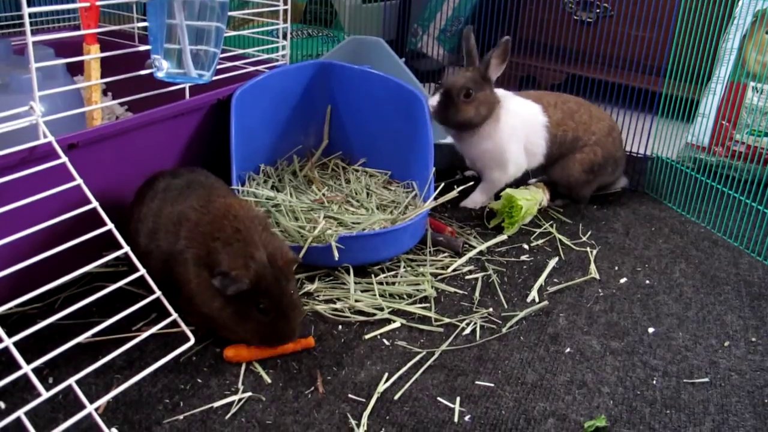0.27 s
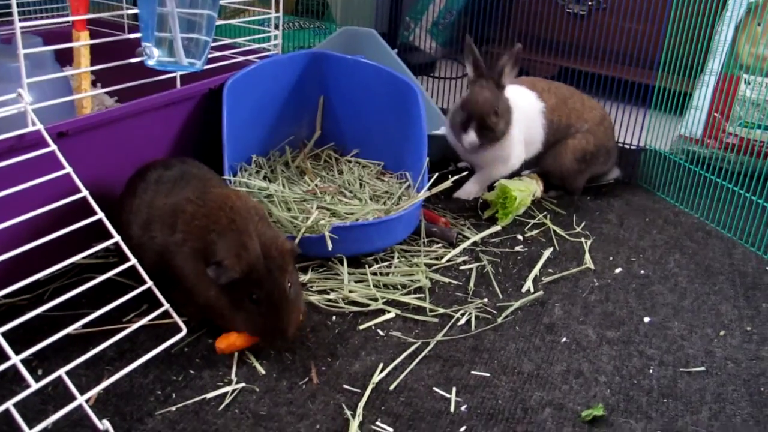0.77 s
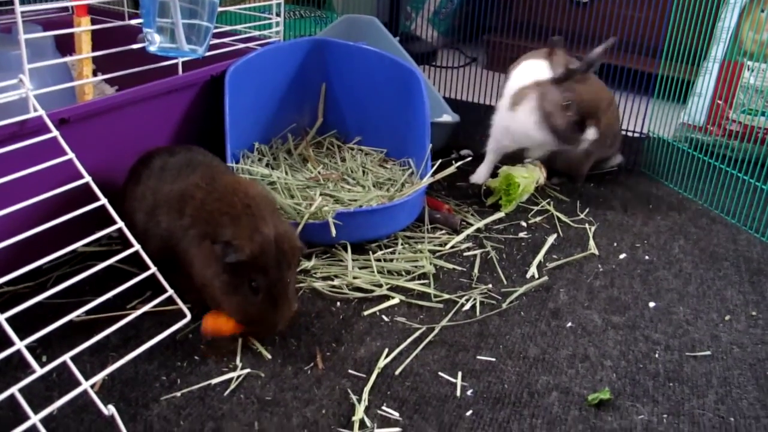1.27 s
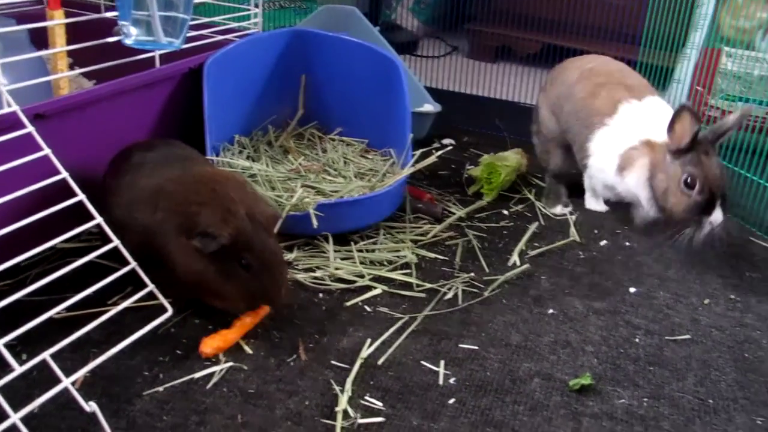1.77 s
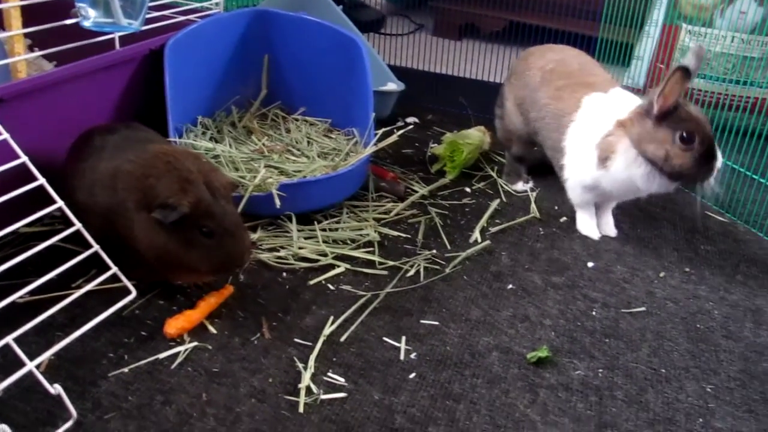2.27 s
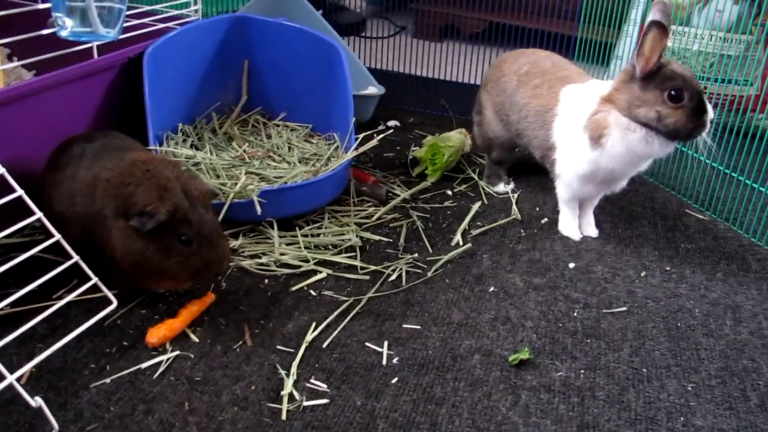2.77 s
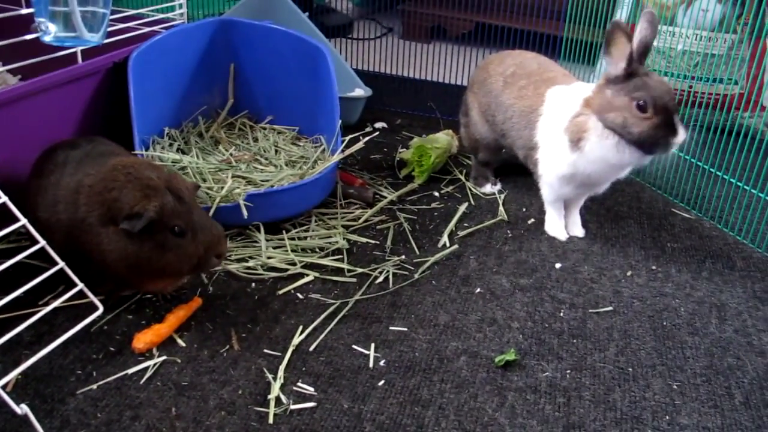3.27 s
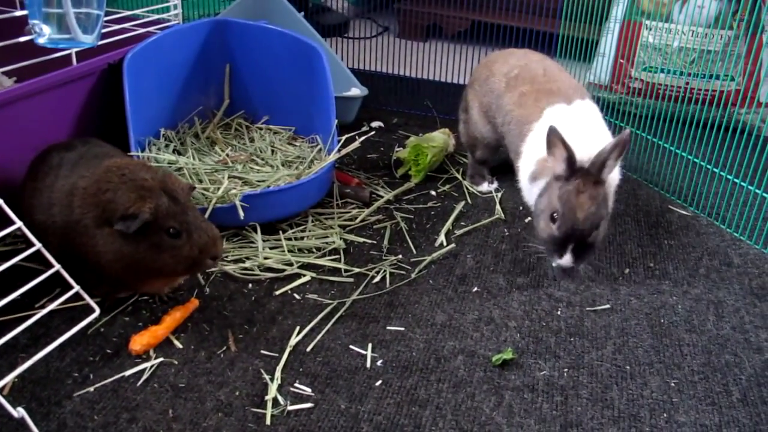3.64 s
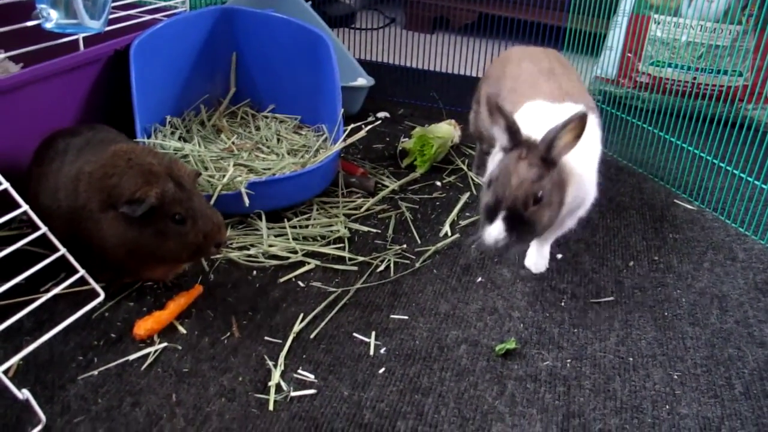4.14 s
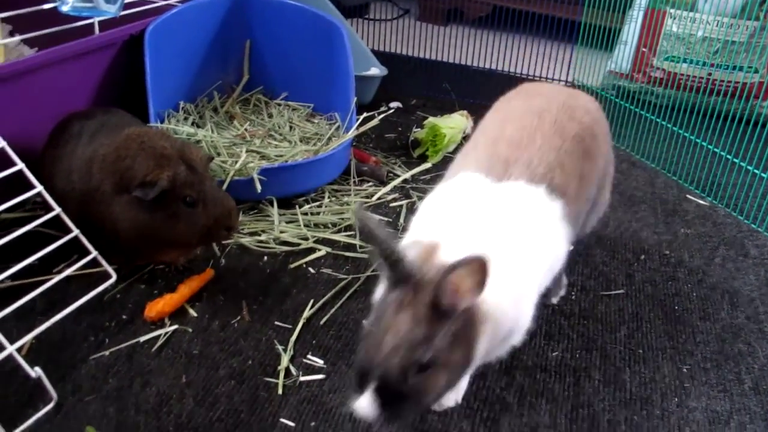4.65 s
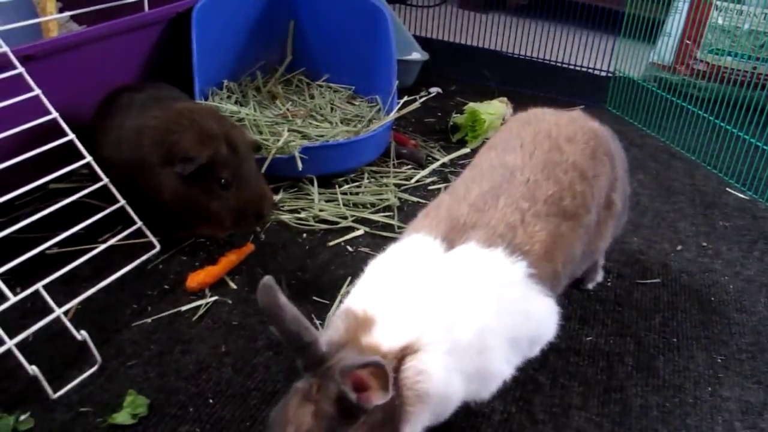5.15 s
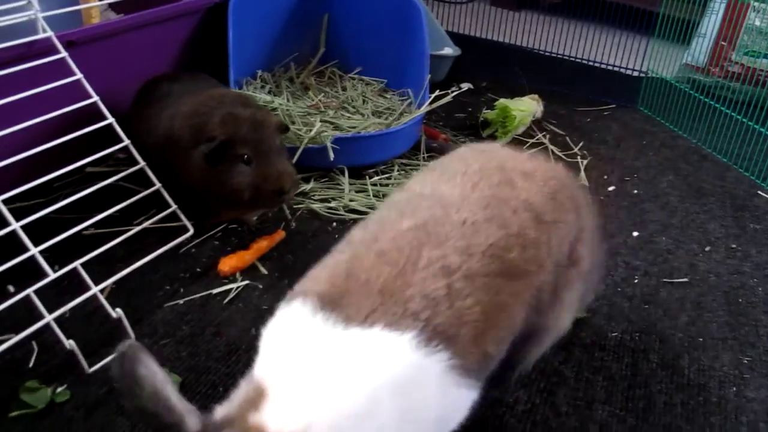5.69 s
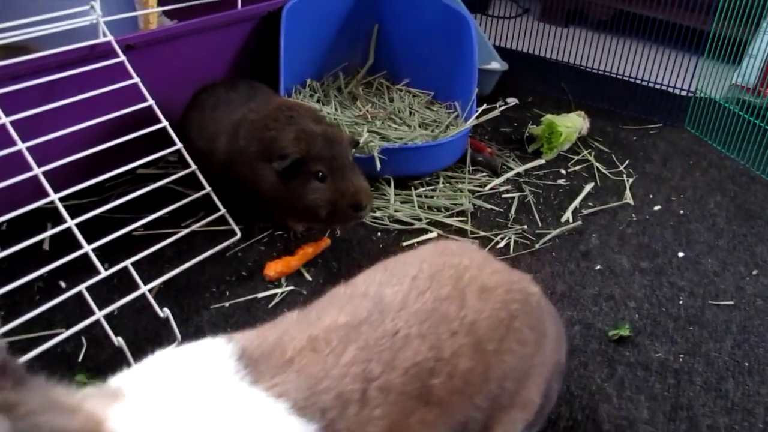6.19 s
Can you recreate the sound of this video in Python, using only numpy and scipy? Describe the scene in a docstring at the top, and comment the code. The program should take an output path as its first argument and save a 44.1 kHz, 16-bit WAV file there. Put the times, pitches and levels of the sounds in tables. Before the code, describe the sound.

A quiet indoor pen heard closely in stereo, with soft airy room noise, a very thin high whine and a faint low hum that sinks and fades around 3 s. From the start a guinea pig clucks in short, rapid notes, most flicking upward at the end, bright and frequent until about 2.3 s. Hay rustles and crunches over the first second, with a loud, sharp stalk snap at 0.7 s. More crisp cracks come at 1.25 and 1.5 s, amid a run of soft, padded rabbit thuds from 1.1 to 1.9 s. From 3 s the clucks grow lower, softer and hoarser, with light crunches and a small snap near 4 s. Hop thuds return at 4.6 and 4.9 s; hay rustles around 5.1 and 5.5 s. More paws fall at 5.8 and 5.9 s, with a hard, near, dry click between them. A faint gliding squeak follows at 6.2 s, among the last quiet clucks.

```python
"""A guinea pig clucks in bouts of upswept notes, lower and softer as it settles: harmonics slide through
fixed resonances. Under it lie a quiet room of filtered noise, a low sine hum and a thin unsteady whine.
It nibbles among loose hay, which rustles, crunches and ticks as random fractures, and two-break stalks snap.
A rabbit hops over the carpet: damped thuds with scuffs. Late on come a near click and a faint gliding squeak.
The sounds of the animals and the hay, but for click and squeak, echo briefly in an indoor pen."""
import sys
import numpy as np
from scipy import signal
from scipy.fft import rfft, irfft, next_fast_len
from scipy.io import wavfile
from scipy.ndimage import uniform_filter1d

SR = 44100
rng = np.random.default_rng(int(sys.argv[2]) if len(sys.argv) > 2 else 0)


def wav_out(sig):
    """Save sig, one row per channel (or a flat mono array), as 16-bit PCM at SR to the path in sys.argv[1]."""
    wavfile.write(sys.argv[1], SR, np.round(np.clip(np.atleast_2d(sig).T, -1, 1) * 32767).astype(np.int16))


N = 283115
TIME = np.arange(N) / SR
EDGE_HZ = 15800  # upper band limit


def amp(db):
    """Level as a logarithm of amplitude: converts decibels to linear gain."""
    return 10 ** (np.asarray(db) / 20)


def unit(x):
    """Power normalisation: scales a signal to a root mean square of 1."""
    return x / np.sqrt(np.mean(x ** 2) + 1e-20)


def read(points, hz):
    """Spectral interpolation: reads a table along a logarithmic frequency axis."""
    f, value = np.transpose(points)
    return np.interp(np.log(hz + 1), np.log(f + 1), value)


def follow(points, at, axis=1):
    """Linear interpolation: reads one column of a curve, held constant beyond its ends."""
    columns = np.transpose(points)
    return np.interp(at, columns[0], columns[axis])


def panned(x, pan_db):
    """Interaural level difference: places a sound by making left louder than right by pan_db."""
    return x * amp([[pan_db / 2], [-pan_db / 2]])


def add(mix, s, sound):
    """Superposition: sums a sound into the mix from time s, trimmed to fit."""
    at = round(s * SR)
    sound = sound[..., max(-at, 0):]
    part = mix[:, max(at, 0):][:, :sound.shape[-1]]
    part += sound[..., :part.shape[1]]


def colour(x, points):
    """Linear filtering: multiplies the spectrum of a long sound by a gain curve."""
    size = next_fast_len(N)
    gain = amp(read(points, np.fft.rfftfreq(size, 1 / SR)))
    return irfft(rfft(x, size) * gain, size)[..., :N]


def causal(gain):
    """Minimum phase: the impulse response of this spectrum whose energy comes earliest."""
    log_gain = np.log(np.maximum(np.r_[gain, gain[-2:0:-1]], 1e-5))
    return np.fft.ifft(np.exp(np.conj(signal.hilbert(log_gain)))).real


def room(x, walls_db, tail_db):
    """Reverberation: a few discrete wall echoes over a diffuse, exponentially decaying tail."""
    # Early echoes of the pen's walls. Each row: delay in seconds, level in dB relative to walls_db.
    walls = [(0.011, -12), (.015, -5), (0.0244, -7.5)]
    # Absorption in the room. Each row: frequency in Hz, time to decay by 60 dB in seconds.
    decay_times = [(1200, 0.27), (14000, 0.22)]
    size = SR // 3
    hz, t, z = signal.stft(rng.standard_normal((2, size)), SR, nperseg=256)
    fade = amp(-60 * t / read(decay_times, hz)[:, None])
    tail = signal.istft(z * fade, SR, nperseg=256)[1][:, :size]
    tail = tail * np.minimum(TIME[:size] / 0.0066, 1)  # the tail builds up over 6.6 ms
    echo = amp(tail_db) * tail / np.linalg.norm(tail[0])
    for delay, db in walls:
        echo[:, round(delay * SR)] += amp(db + walls_db)
    return signal.oaconvolve(x, echo, axes=1)[:, :N]


def clucks(scoop=4.49, rolloff_db=-5, rise=0.0041, fall=0.0078, hoarse_db=-21, clear_hz=1000,
           top_hz=3600, top_db=-7, upswept_rise=0.0055, swell_db=7):
    """Source and filter: upswept vocal harmonics, hoarser toward the end, pass through throat resonances."""
    # Each row: start in seconds, length in seconds, middle pitch in Hz, base level in dB, shape of bend.
    notes = [ (-.025, 0.046, 912, -41.5, "hook"), (.163, 0.061, 888, -44, "hook"),
             (0.26, 0.05, 1011, -42, "dip"), (.51, 0.031, 1167, -41, "whip"),
             (0.576, 0.064, 976, -41.5, "hook"), (0.684, 0.055, 958, -43.5, "hook"),
             (0.977, 0.032, 1170, -40.5, "whip"), (1.041, 0.054, 974, -40, "hook"),
             (1.438, 0.04, 955, -41, "whip"), (1.517, .052, 894, -42.5, "lift"),
             (1.594, 0.063, 917, -42, "dip"), (1.823, 0.061, 858, -41.5, "hook"),
             (1.927, 0.056, 959, -41.5, "dip"), (2.203, 0.069, 866, -45, "hook"),
             (2.313, 0.049, 1216, -43, "lift"), (2.938, 0.055, 942, -45, "dip"),
             (3.043, 0.028, 980, -42, "flat"), (3.236, 0.06, 865, -46, "dip"),
             (3.339, 0.065, 826, -44.5, "dip"), (3.435, 0.064, 932, -47.5, "dip"),
             (3.692, 0.059, 849, -49.5, "hook"), (3.807, 0.026, 1075, -54.5, "flat"),
             (4.07, 0.076, 785, -50, "dip"), (4.175, 0.068, 856, -44.5, "dip"),
             (4.303, 0.018, 773, -45.5, "flat"), (4.525, 0.068, 694, -47.5, "dip"),
             (4.646, 0.054, 701, -46, "dip"), (5.203, 0.053, 748, -46.5, "lift"),
             (5.304, 0.036, 946, -47.5, "whip"), (5.487, 0.064, 782, -48, "lift"),
             (5.589, 0.037, 740, -48, "lift"), (6.124, 0.034, 792, -54, "lift"),
             (6.312, 0.061, 699, -51, "lift")]
    # The guinea pig's throat and nose. Each row: frequency in Hz, gain in dB.
    throat = [(600, 1.5), (860, -7), (1080, 1), (1250, -14), (1600, -10.5), (2200, -7.5), (2900, -9.5),
              (4300, -16), (6400, -8), (9000, -23)]
    # The push of air through one cluck. Each row: share of its length, gain in dB.
    air_push = [(0, 3), (.5, 0), (1, 1)]
    # Overtones as the head turns. Each row: time in seconds, second harmonic in dB, higher harmonics in dB.
    facing = [(0, 1, 1), (1.65, -3, -13), (1.94, -5, -2), (3, -11, 0), (3.4, -0.5, 5.5), (4.6, -2, -3),
              (5.4, 6, 6), (6.4, 10.5, 4.5)]
    # Ways a cluck bends. Each entry: opening and final pitch factors, lateness of the upsweep as an exponent.
    shapes = {"whip": (.77, 2.2, 2.8), "hook": (.94, 2.7, 3.7), "lift": (.94, 1.7, 3),
              "dip": (1.17, 1.95, 3), "flat": (0.95, 1.26, 3.2)}
    out = np.zeros((2, N))
    k = np.arange(1, 11)[:, None]  # harmonic numbers
    for start, length, middle, db, shape in notes:
        opening, final, bend = shapes[shape]
        t = np.arange(0, length, 1 / SR)
        u = t / t[-1]
        waver = unit(uniform_filter1d(rng.standard_normal((len(k), SR // 8)), size=90))[:, :len(t)]
        hz = middle * opening ** ((1 - u) ** scoop) * final ** (u ** bend)
        # the folds lose their grip as the pitch climbs
        hz = hz * (1 + (.012 + .04 * u ** 3) * waver[-1])
        second, higher = follow(facing, start, axis=1), follow(facing, start, axis=2)
        source_db = rolloff_db * np.log2(k) + second * (k == 2) + higher * (k > 2)
        source_db = source_db + top_db / (1 + (top_hz / (k * hz)) ** 8)  # treble shelf
        partials = amp(read(throat, k * hz) + source_db) * (k * hz < EDGE_HZ)
        # overtones flutter more than the fundamental and carry more turbulence, most in the low notes
        hiss = unit(uniform_filter1d(rng.standard_normal(partials.shape), size=30))
        rasp = .45 * (1 - 1 / k + u ** 3)
        turbulence = amp(hoarse_db) * k * hiss * (clear_hz / middle) ** 2
        grain = 1 + rasp * waver + turbulence
        phase = 2 * np.pi * k * np.cumsum(hz) / SR
        note = np.sqrt(2) * (partials * grain * np.sin(phase)).sum(0)
        # the steeply upswept notes swell in more slowly
        upswept = shape in ("whip", "hook")
        onset = np.clip(t / (upswept_rise if upswept else rise), 0, 1)
        gate = onset * np.clip((t[-1] - t) / fall, 0, 1)
        swell = swell_db * (np.minimum(u, .6) - .4) * upswept
        add(out, start, note * gate * amp(db + follow(air_push, u) + swell))
    return panned(out, 0.46) + room(out, walls_db=-7.5, tail_db=-10.5)


def background(air_db=-55, whine_hz=8802, whine_db=-77, wander_hz=25):
    """Stationary sources: partly correlated stereo noise, a sinking, fading hum and an unsteady whine."""
    # The still room. Each row: frequency in Hz, relative spectral level in dB.
    air_spectrum = [(12, -41), (20, -2.5), (55, -1), (171, -9), (467, -11.5), (800, -15.5), (1590, -18.5),
                    (5440, -22), (8700, -26), (15700, -34)]
    # Likeness of the two sides. Each row: frequency in Hz, left-right correlation from 0 to 1.
    likeness = [(130, 0.82), (300, 0.44), (12000, 0.016)]
    # The low hum. Each row: time in seconds, pitch in Hz, rms level in dB.
    hum_course = [(0, 49, -58.5), (2.85, 47.78, -61), (3.25, 34.8, -72)]
    a, b, drift = rng.standard_normal((3, N))
    same = np.clip(read(likeness, np.fft.rfftfreq(N, 1 / SR)), 0, 1)
    mid = irfft(rfft(a) * np.sqrt(1 + same), N)
    side = irfft(rfft(b) * np.sqrt(1 - same), N)
    air = amp(air_db) * unit(colour(np.array([mid + side, mid - side]), air_spectrum))
    hum_phase = 2 * np.pi * np.cumsum(follow(hum_course, TIME)) / SR
    hum = amp(follow(hum_course, TIME, axis=2)) * np.sin(hum_phase)
    whine_pitch = whine_hz + wander_hz * unit(uniform_filter1d(drift, size=200))
    whine = amp(whine_db) * np.sin(2 * np.pi * np.cumsum(whine_pitch) / SR)
    return air + np.sqrt(2) * (hum + whine)  # root 2 makes the sine levels rms


def fibres(size, per_s, spread_db):
    """Random point process: tiny fractures, a few of them large, partly shared by the two sides."""
    sizes = amp(spread_db * np.minimum(rng.exponential(1, (3, size)), 4))
    sizes = sizes * rng.choice([-1, 1], (3, size))
    fractures = sizes * (rng.random((3, size)) < per_s / SR)
    return fractures[0] + 0.85 * fractures[1:]


def rustle(stir_db=-70.5, flutter_db=2):
    """Friction noise: animals that sit and shift keep hay crackling, which swells as they brush through."""
    # Passages through the hay. Each row: middle in seconds, half length in seconds, added power in dB.
    brushes = [(.6, 0.53, -66), (5.06, 0.07, -64), (5.457, 0.21, -62)]
    # The colour of rustling hay. Each row: frequency in Hz, gain in dB.
    hay = [(500, -20), (1500, 0), (5800, 6.5), (7200, 2), (9000, -15), (15000, -29)]
    power = amp(stir_db) ** 2
    power = power + sum(amp(db) ** 2 * np.exp(-((TIME - s) / half) ** 2) for s, half, db in brushes)
    # the rustle comes and goes from stalk to stalk
    flutter = unit(uniform_filter1d(rng.standard_normal(N), size=2500))
    crackle = colour(fibres(N, per_s=1500, spread_db=6.0), hay)
    grains = unit(crackle * amp(flutter_db * flutter)) * np.sqrt(power)
    return grains + room(grains, walls_db=-33, tail_db=0.5)


def crunches(centre_hz=5100, octaves=0.33, body_db=-3.5, body_hz=7000, swell=0.56, ring_db=1,
             ring_width_hz=600, fractures=22.0):
    """Progressive fracture: a bite or step cracks a few fibres, then most, then ever fewer; a stalk rings."""
    # Each row: moment of greatest strain in seconds, rms level there in dB, ring of the stalk in Hz.
    bites = [(.422, -56.5, 6500), (0.6282, -39.5, 6900), (.66, -37, 6800), (1.246, -44.5, 5870),
             (1.268, -44.5, 5900), (1.4725, -35, 5700), (2.921, -47.5, 4600), (3.2264, -43, 3900),
             (3.429, -47.5, 5800), (4.1747, -44, 5500), (4.6113, -48, 6500)]
    middling_db, middling_fade_s = -43.5, 0.0081  # a middling crunch and its fading time
    halving_db, slowest_fade_s = 4, 0.021  # this much louder fades twice as fast
    out, size = np.zeros((2, N)), SR // 8
    hz, t = np.fft.rfftfreq(512, 1 / SR) + 1, TIME[:size] - 1 / 50
    band = np.exp(-.5 * (np.log2(hz / centre_hz) / octaves) ** 2)
    band = band + amp(body_db) / (1 + (hz / body_hz) ** 4)
    for s, db, ring_hz in bites:
        # fibres that give way at once are loud, a slow tear is soft
        fading = min(middling_fade_s * 2 ** ((middling_db - db) / halving_db), slowest_fade_s)
        strain = np.exp(-np.maximum(t, -t / swell) / fading)
        stalk = band + amp(ring_db) / (1 + (2 * (hz - ring_hz) / ring_width_hz) ** 2)
        # a slow tear spreads its fractures out, so they are heard one by one
        force = fibres(size, per_s=fractures / fading, spread_db=5.5) * strain
        burst = signal.fftconvolve(force, causal(stalk)[None], axes=1)
        add(out, s + t[0], amp(db) * unit(burst) * np.sqrt(np.mean(strain ** 2)))
    return out + room(out, walls_db=-5.5, tail_db=-7)


def ticks(hz=6000, octaves=0.39, split_s=0.00049):
    """Impulsive excitation: a splitting fibre gives a sharp, dry noise burst about a millisecond long."""
    # Single fibres that split. Each row: start in seconds, level of the tick's total energy in dB.
    splits = [(.4145, -29), (0.4243, -29), (0.6147, -24), (1.2394, -25.5), (2.386, -33), (2.602, -30.5),
              (2.7784, -29), (3.053, -32), (3.092, -32), (4.984, -32)]
    out, t = np.zeros((2, N)), TIME[:SR // 100]
    distance = np.log2((np.fft.rfftfreq(512, 1 / SR) + 1) / hz) / octaves
    body = causal(np.exp(-.5 * distance ** 2) + 1 / 20)
    for s, db in splits:
        split = rng.standard_normal((3, len(t))) * np.exp(-t / split_s)
        # the first noise is common to both sides
        tick = signal.fftconvolve(split[0] + split[1:] / 2, body[None], axes=1)
        add(out, s, amp(db) * tick / np.linalg.norm(tick, axis=1, keepdims=True))
    return out + room(out, walls_db=-8, tail_db=0)


def resonances(modes, hz):
    """Modal superposition: sums the left and right gains of a few resonance peaks."""
    return sum(panned(amp(db) / (1 + (2 * (hz - f) / width) ** 2), pan_db) for f, width, db, pan_db in modes)


def snaps(second_db=-6, splinter_db=-19, splinter_time=0.0017):
    """Brittle fracture: two quick breaks and a spray of splinters excite the modes of a dry stalk."""
    # Stalks that break clean. Each row: start in seconds, level of the crack's total energy in dB,
    # pan left over right in dB, ring of the stalk in dB, delay of the second break in seconds,
    # send to the room in dB, frequency in Hz above which it is dull.
    breaks = [(.6962, -18, 0, -3, 0.00018, -7, 9000), (0.7205, 5.5, -6.5, 3.5, 0.00096, -9.5, 8400),
              (1.266, -14, -7.5, -9, 0.00083, -9.5, 13500), (3.9786, -19, 4, -7, 0.0021, -6, 6693)]
    # The colour of a break. Each row: frequency in Hz, gain in dB.
    break_colour = [(200, -16.5), (1500, -1), (3200, -2.5), (8500, -3), (16000, -6)]
    # Rings of a dry stalk. Each row: frequency in Hz, width in Hz, gain in dB, pan left over right in dB.
    stalk_modes = [(2960, 1200, 6, 5), (5500, 760, 12.5, 17), (6800, 590, 21, -18), (8300, 4300, -1, -23)]
    out, send = np.zeros((2, 2, N))
    hz, t = np.fft.rfftfreq(1024, 1 / SR), TIME[:SR // 80]
    for s, db, pan_db, ring_db, second, room_db, dull_hz in breaks:
        force = amp(splinter_db) * rng.standard_normal((2, len(t))) * np.exp(-t / splinter_time)
        force[:, 0] += 1
        force[:, round(second * SR)] += amp(second_db)
        ringing = 1 + amp(ring_db) * resonances(stalk_modes, hz)
        gain = amp(read(break_colour, hz)) * ringing / (1 + (hz / dull_hz) ** 4)
        body = [causal(side) for side in gain]
        crack = signal.fftconvolve(force, body, axes=1)
        crack = amp(db) * crack / np.linalg.norm(crack, axis=1, keepdims=True)
        crack = panned(crack, pan_db)
        add(out, s, crack)
        add(send, s, crack * amp(room_db))
    return out + room(send, walls_db=0, tail_db=1.5)


def paws(hz=166, press=0.0024, rebound=0.01113, rebound_db=-8, weight_db=-15, scuff_db=-27,
         shudder_db=-19, shudder_s=0.015, variety=0.14):
    """Damped impact: a paw dents the padded floor and rebounds, with body weight, scuff and shudder."""
    # Soft paw falls. Each row: moment of the dent in seconds, level of the main dent in dB.
    falls = [(1.145, -34.5), (1.299, -39), (1.3857, -27.5), (1.519, -38), (1.5656, -29), (1.6148, -34),
             (1.704, -34.5), (1.843, -40), (4.127, -40), (4.6443, -39.5), (4.8559, -32.5), (5.4587, -41),
             (5.7702, -33.5), (5.9123, -34.5), (6.187, -42)]
    out, t = np.zeros((2, N)), TIME[:SR // 8] - 1 / 50
    floor_band = signal.butter(2, [70, 300], "bandpass", fs=SR, output="sos")
    for s, db in falls:
        # each fall has its own softness, and a rebound that varies four times as much
        soft, bounce = 1 + variety * rng.uniform(-1, 1, 2) * [1, 4]
        dents = [(1, t / soft), (amp(rebound_db) * bounce, (t - rebound) / soft)]
        push = -sum(g * np.cos(2 * np.pi * hz * d) / np.cosh(d / press) for g, d in dents)
        # the body's weight pushes at half the frequency and lasts twice as long
        push -= amp(weight_db) * np.cos(np.pi * hz * t) / np.cosh(t / press / 2)
        grit, rumble = rng.standard_normal((2, len(t)))
        scuff = amp(scuff_db) * unit(signal.lfilter([1], [1, -.93], grit)) / np.cosh(t / 0.0071)
        shudder_fade = np.exp(-np.maximum(t / shudder_s, -t / press))
        shudder = amp(shudder_db) * unit(signal.sosfilt(floor_band, rumble)) * shudder_fade
        add(out, s + t[0], amp(db) * (push + scuff + shudder))
    return out + room(out, walls_db=-19.0, tail_db=-17.5)


def click(s=5.8311, db=10, knock_db=-19):
    """Impulse response: one hard contact, too near to have any room, rings briefly over a dull knock."""
    # Short rings. Each row: frequency in Hz, width in Hz, relative gain in dB, pan left over right in dB.
    click_modes = [(430, 70, -10, -3), (2720, 450, -13, 21.5), (3850, 410, -9, 18), (5070, 300, -5.5, 0),
                   (6560, 3800, -19, -18)]
    out, hz = np.zeros((2, N)), np.fft.rfftfreq(1024, 1 / SR)
    knock = amp(knock_db) / (1 + hz / 700)
    gain = (resonances(click_modes, hz) + knock) / (1 + (hz / 9500) ** 10)
    add(out, s, amp(db) * np.array([causal(side) for side in gain]))
    return out


def squeak(s=6.218, length=0.049, hz=4300, crest=.36, sag=.22, db=-61):
    """Frequency modulation: one faint, thin tone whose pitch arches over and sinks."""
    out, u = np.zeros((2, N)), np.linspace(0, 1, round(length * SR))
    pitch = hz * (1 - sag * (u - crest) ** 2)
    add(out, s, amp(db) * np.sin(np.pi * u) * np.sin(2 * np.pi * np.cumsum(pitch) / SR))
    return out


def scene():
    """Superposition of all the sounds in the pen."""
    voice_and_room = clucks() + background()
    hay = rustle() + crunches() + ticks() + snaps()
    return voice_and_room + hay + paws() + click() + squeak()


def record(dry):
    """Band limitation: a linear-phase low-pass filter at the recorder's upper edge."""
    low_pass = signal.firwin(511, EDGE_HZ, window=("kaiser", 9), fs=SR)
    return signal.oaconvolve(dry, low_pass[None], "same")


dry = scene()
out = record(dry)
wav_out(out)
```